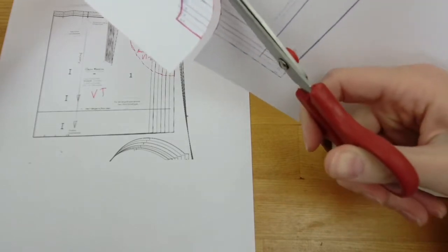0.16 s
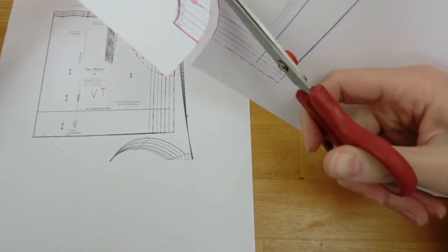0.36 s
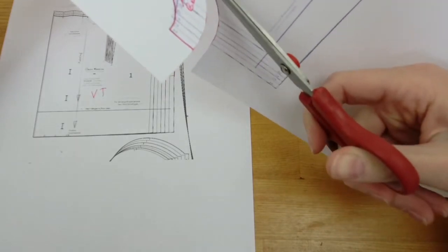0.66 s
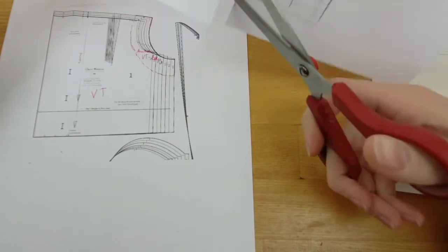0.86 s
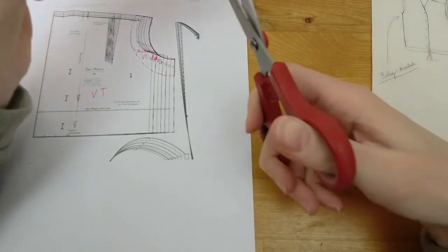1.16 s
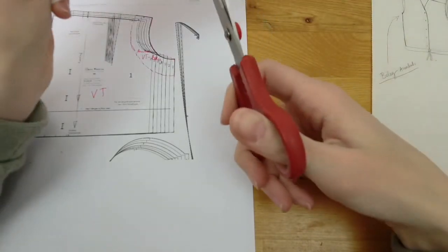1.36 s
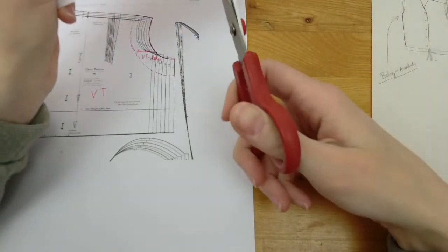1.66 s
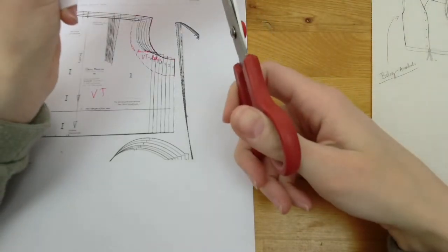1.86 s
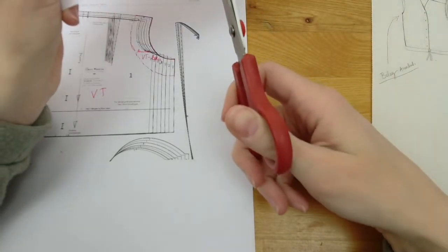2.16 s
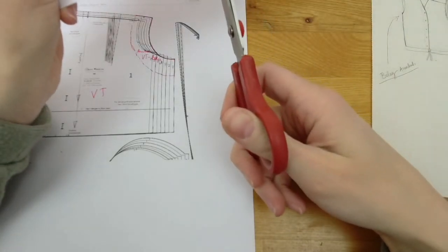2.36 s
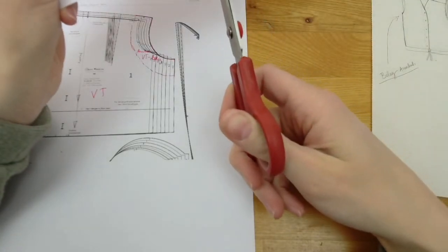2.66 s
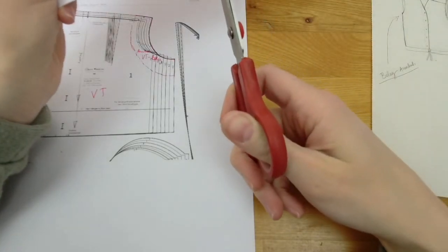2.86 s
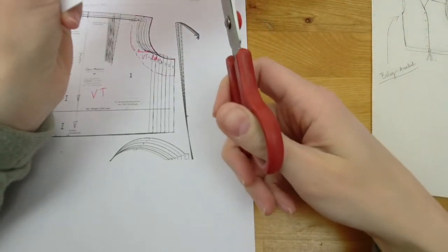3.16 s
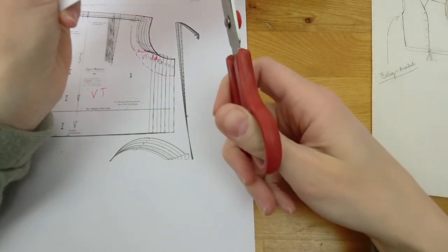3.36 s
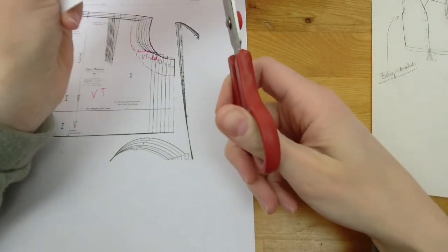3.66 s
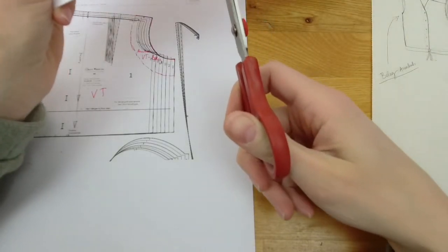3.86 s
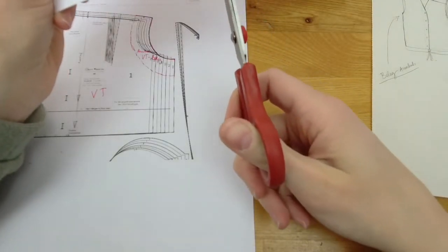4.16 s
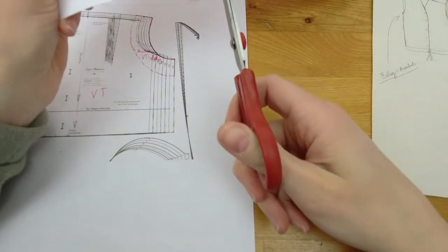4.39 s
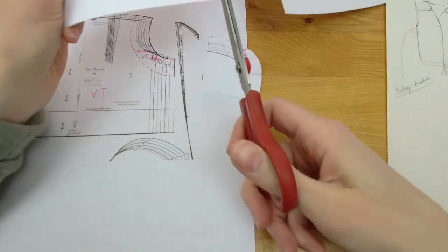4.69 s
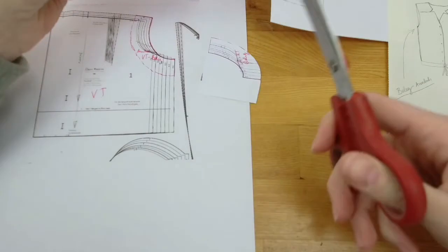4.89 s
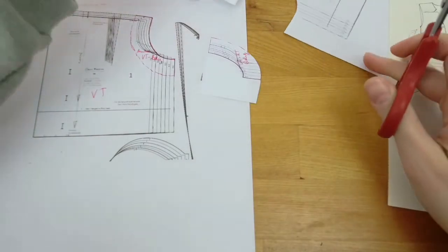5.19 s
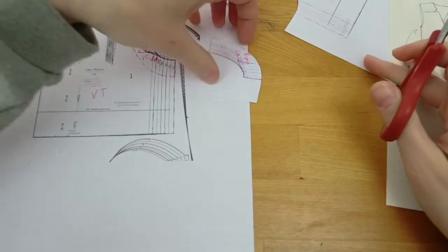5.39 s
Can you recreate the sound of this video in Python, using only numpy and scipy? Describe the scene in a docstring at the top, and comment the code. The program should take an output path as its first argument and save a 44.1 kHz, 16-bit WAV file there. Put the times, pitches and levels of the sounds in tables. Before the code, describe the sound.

Close stereo sound of paper being cut above a wooden table indoors. A few strong snips and a faint metallic blade rub open it, followed by shuffling and loose flaps of the sheet. A quiet gap leads into fine, gentle crunches with light sliding hiss, one hard final snip, paper brushing away, and low soft knocks.

```python
"""Scissors through paper

Scissors cut a pattern piece out of a sheet of paper, held just above a wooden table in a small room.
Each snip is a few bursts of breaking fibres: random grains that crack, fizz and drum through resonances.
Between snips the blades open in narrow-band friction noise, and coloured grains make the paper slide and flap.
Soft pushes boom in decaying table modes; at the end the piece comes free and a hand comes down on the table.
Noise echoes add the room, and short, wandering echo paths spread the whole mix to left and right."""
import sys
import numpy as np
from scipy import signal
from scipy.fft import rfft, irfft
from scipy.io import wavfile

SR = 44100
rng = np.random.default_rng(int(sys.argv[2]) if len(sys.argv) > 2 else 0)


def master_out(mix):
    """Clip the mix to full scale and print it as 16-bit PCM to the path in sys.argv[1]."""
    frames = np.transpose(np.atleast_2d(mix))
    ceiling = np.clip(frames, -1, 1)
    pcm = np.round(ceiling * 32767).astype(np.int16)
    wavfile.write(sys.argv[1], SR, pcm)


N = 244049
TIME = np.arange(N) / SR   # seconds

# Tone of the still room. Each row: frequency in Hz, relative level in dB.
STILL_COLOUR = [(20, -27), (60, -12.5), (97, -1.5), (140, -4), (900, -18.5), (1500, -22), (10000, -30.5)]
STILL_DB = -72

# Snips: each closing of the blades holds the sheet differently. Each row: start in seconds,
# sheet level in dB against the crack (mid-snip), fizz level in dB against the crack,
# tilt of the crack in dB per octave, pitch of the sheet as a ratio, lowest frequency it radiates in Hz,
# resonance of the cut edge in Hz, its lift in dB.
SNIPS = [(0, 0.5, -10, 0, 1.003, 303, 4130, 8), (.18, -4, -8, -0.5, 0.86, 385, 4060, 9),
         (.43, -10, -11, 0, 0.9, 397, 4240, 15.5), (.55, -14.5, -11, -4, 0.97, 326, 3830, 11.5),
         (.85, -21.5, -7, 5, 0.98, 300, 4300, 5), (.88, -6, -26.5, -6, 1.11, 260, 1450, 8),
         (2.04, -0.5, -4.5, -2, 1, 430, 2860, 8), (2.17, 6.5, -3, 0.5, 0.97, 426, 2880, 19),
         (2.29, 7.5, -4, -3, 0.98, 450, 2770, 7), (2.54, 2.5, -4, -8, 1, 529, 2780, 2),
         (3.03, -9.5, -3, -0.5, 1.06, 298, 3960, 12.5), (3.34, -5.5, -5.5, -4, 0.986, 470, 2670, 6.5),
         (3.56, -1.5, -2.5, -4.5, 0.98, 480, 2490, 10), (4.21, 1.5, -0.5, -5, 0.99, 620, 2860, 4.5),
         (4.49, 0.5, -2.5, -2, 0.98, 620, 3120, 28), (4.505, -20, -16, 6, 1.13, 290, 6100, -7),
         (4.71, -20, -10, 5.5, 0.94, 400, 5560, -8)]
DRUM_FADE_DB = 3.5   # the sheet drums less as the cut runs out towards the tips

# Bursts of parting fibres within the snips. Each row: time in seconds, volley length in seconds,
# crack level in dB (averaged over two volley lengths).
BURSTS = [(0.0106, 0.00098, -21), (0.0212, 0.00025, -24), (0.0507, 0.0016, -23.5), (0.0706, 0.00052, -36),
          (0.1951, 0.0023, -21), (0.2378, 0.00061, -21), (0.247, 0.0017, -20.5), (0.262, 0.0013, -31.5),
          (0.441, 0.0017, -20.5), (0.476, 0.00065, -23.5), (0.4823, 0.00068, -22), (0.4867, 0.00095, -17.5),
          (0.511, 0.00044, -39), (0.5646, 0.0012, -10.5), (0.58, 0.00059, -16), (.584, 0.00098, -11.5),
          (0.6007, 0.0012, -14), (0.8668, 0.0013, -12.5), (0.8857, 0.002, -20), (0.9, 0.0019, -35),
          (2.065, .0012, -37.5), (2.0755, 0.0016, -35), (2.093, 0.001, -33.5), (2.103, 0.0013, -35),
          (2.122, .0016, -36.5), (2.138, .001, -44), (2.1477, 0.0013, -34), (2.159, 0.0016, -31.5),
          (2.182, 0.00149, -31.5), (2.2118, 0.00088, -28), (2.23, 0.0012, -45), (2.3049, 0.002, -40),
          (2.334, 0.0015, -37.5), (2.3533, 0.0011, -35.5), (2.3604, 0.0012, -31.5), (2.3952, 0.0019, -31.5),
          (2.42, 0.00081, -38.5), (2.437, 0.0014, -30), (2.449, 0.00081, -33.5), (2.4739, 0.0021, -29),
          (2.554, 0.0014, -32), (2.572, 0.0018, -33), (2.5855, 0.00085, -33.5), (2.76, 0.00098, -36),
          (2.786, 0.0013, -42.5), (3.0412, 0.00101, -15.5), (3.356, 0.0019, -32), (3.3756, 0.0011, -24),
          (3.403, 0.0013, -35), (3.426, 0.0014, -32.5), (3.572, 0.00096, -31), (3.5793, 0.00073, -27),
          (3.604, 0.0012, -31.5), (3.613, 0.0014, -30), (3.622, 0.00095, -32.5), (3.823, 0.0007, -47),
          (4.188, 0.0014, -44), (4.225, 0.0023, -30.5), (4.238, 0.0013, -28), (4.274, 0.00085, -30),
          (4.289, 0.0017, -25), (4.38, 0.0011, -32.5), (4.443, 0.00089, -45), (4.4963, 0.0026, -24.5),
          (4.5098, 0.00062, -6.5), (4.7188, 0.00021, -12.5), (4.7592, 0.00066, -16)]
SECOND_AFTER, SECOND_DB = 2.183, -3.5   # second volley: gap in volley lengths, level against the first
# The snap in a volley: level against the spray, moment in volley lengths, scatter of its log.
SNAP_DB, SNAP_AT, SNAP_JITTER = -6, .8, .25
BARE_DB = -8   # bare click of the fibres against the resonances of the cut
EDGE_WIDTH_HZ, EDGE_DETUNE = 420, 0.022   # cut edge: width, scatter of its log pitch per burst

# Slow cuts that crunch all the way. Each row: start in seconds, length in seconds,
# crack level in dB of the strongest bursts.
TEARS = [(0.734, .13, -27), (2.043, .165, -41.5)]
TEAR_VOLLEY_S, TEAR_SPREAD_DB = 0.001, 12

# Resonances of the sheet as a membrane. Each row: frequency in Hz, width in Hz, relative level in dB.
SHEET_MODES = [(402, 230, -12.5), (637, 81, -7.5), (884, 150, 0.5), (1141, 230, -8)]
# Resonances of the cut at the blades. Each row: frequency in Hz, width in Hz, relative level in dB.
CRACK_MODES = [(1830, 480, 2), (3016, 380, 3), (4290, 1700, -1.5), (6400, 900, 5), (6580, 570, -6)]
# Resonances of the snapping fibres. Each row: frequency in Hz, width in Hz, relative level in dB.
FIZZ_MODES = [(8094, 1100, -2), (9700, 1800, 1), (12170, 1600, -1)]

# Scissors, hand and wrist knocking on the table. Each row: time in seconds,
# contact in seconds (four times the decay constant of the push), level in dB.
BUMPS = [(0.2, 0.001, -51.5), (0.924, .004, -49.5), (5.195, .004, -61), (5.349, 0.0026, -37.5),
         (5.368, 0.0017, -37.5), (5.387, 0.0011, -50), (5.416, 0.0015, -40.5), (5.48, 0.0015, -45)]
# Modes of the table top. Each row: frequency in Hz, level in dB, 60 dB decay in seconds.
TABLE_MODES = [(97.1, -2, 0.62), (170, 3.5, 0.15), (257, 1.5, 0.0073), (352, -8.5, 0.07), (457, -9.5, 0.21)]
KICK_DB, KICK_LIMIT_DB = -38, -20.5   # a burst kicks the table: against its crack, up to this crack level

# Blades rubbing on each other as they open. Each row: start in seconds, length in seconds, level in dB,
# main resonance in Hz, level of the upper resonances against it in dB.
OPENINGS = [(0.113, 0.031, -48, 4960, -6.5), (0.362, 0.044, -55.5, 5100, -16),
            (1.803, 0.1, -74.5, 4700, -3.5), (3.193, 0.018, -61, 4610, -1)]
# Upper resonances of the rubbing blades. Each row: frequency in Hz, width per filter pass in Hz,
# relative level in dB.
BLADE_UPPER_MODES = [(8300, 500, -1), (9800, 840, -2)]

# Jolts that leave the blades ringing faintly. Each row: time in seconds, level in dB.
JOLTS = [(.252, -41), (.604, -38.5), (1.315, -57)]
BLADE_HZ, BLADE_T60_S = 1950, 0.2

# Sheet edges dragged along or knocked, each sounding in one resonance. Each row: start in seconds,
# length in seconds, level in dB, centre of the resonance in Hz.
EDGE_TOUCHES = [(0.707, 0.023, -40, 830), (0.718, 0.093, -30.5, 2850), (1.172, 0.057, -51, 2925),
                (1.259, 0.0071, -48.5, 1423), (2.903, 0.017, -47, 940), (5.079, 0.0085, -42.5, 970),
                (5.072, 0.025, -44, 2090)]

# Strokes of paper sliding over blades and fingers. Each row: start in seconds, attack in seconds,
# length in seconds, rub level in dB at mid-stroke, growth over the stroke in dB, hiss against rub in dB.
STROKES = [(0.71, 0.015, 0.16, -38, 5, -3), (0.875, 0.016, 0.042, -42.5, -14.5, -17.5),
           (1.155, 0.024, 0.099, -49.5, -1, 5), (1.252, 0.0051, 0.04, -56, -8, -5.5),
           (1.308, 0.0052, 0.022, -55, 7, -4.5), (1.539, 0.055, 0.13, -67, -0.5, 4),
           (1.771, 0.035, 0.11, -69, -14, 2.5), (2.038, 0.015, 0.19, -50, -7.5, -8),
           (2.795, 0.019, 0.36, -63, 28, -5.5), (3.056, 0.019, 0.063, -39.5, -5.5, -4.5),
           (1.84, 0.05, 1.375, -78.5, 9.5, 4.5), (3.304, 0.077, 0.22, -63, -0.5, 1),
           (3.656, 0.032, 0.16, -62.5, -5, 3.5), (3.825, 0.046, 0.11, -55, -7, 5.5),
           (3.937, 0.017, 0.58, -66.5, 12.5, -2), (4.523, 0.0069, 0.033, -38, -5.5, -9),
           (4.563, 0.011, 0.085, -52, 16.5, 1.5), (4.643, 0.0092, 0.075, -43, -12.5, 0.5),
           (4.725, 0.011, 0.045, -31.5, -0.5, 2), (4.777, 0.0092, 0.058, -46, -8.5, 3),
           (4.861, 0.014, 0.093, -51, 24.5, 9.5), (4.957, 0.018, 0.16, -51, -2.5, 8.5),
           (5.124, 0.025, 0.11, -70, -22.5, 11.5), (5.3444, .002, 0.04, -70.5, -16, 20.5),
           (5.401, 0.035, 0.078, -75, -3, 25)]
# Sheet against rub in dB, and the dB it loses for each dB that the hiss gains.
SLIDE_DRUM_DB, LIGHT_TOUCH_SHARE = -5, 0.79
STROKE_RELEASE_S, RELEASE_SHARE = 0.0042, 0.012   # die-away time, plus a share of the stroke length
# Strokes below this level halt and crackle: swing in dB and added crackle gain at the lightest touch.
FIRM_DB, HALTING_DB, HALTING_CRACKLE = -47.5, 3, 0.27
# Tone of the sheet drumming under a stroke. Each row: frequency in Hz, relative level in dB.
SHEET_RUB_COLOUR = [(40, -41.5), (350, -13.5), (550, -18), (880, 0), (1150, -7), (1500, -12), (2500, -19)]
# Tone of the rub itself. Each row: frequency in Hz, relative level in dB.
RUB_COLOUR = [(1000, -34.5), (1700, -9.5), (2300, -11), (2900, 0.5), (3600, -2.5), (4600, 4), (6000, -1),
              (7500, -7.5)]
# Tone of the hiss of a light touch. Each row: frequency in Hz, relative level in dB.
HISS_COLOUR = [(4000, -43), (5800, -5.5), (7300, -1), (8400, 4.5), (10000, 4.5), (12000, 3), (13000, -7.5),
               (14000, -4.5), (15500, -32)]

# Loose sheet flapping, gripped anew or pressed down. Each row: start in seconds, length in seconds,
# level in dB, top of the sound in Hz.
FLAPS = [(0.885, 0.019, -35, 3000), (0.909, 0.032, -33, 2010), (1.003, 0.028, -55, 450),
         (1.06, 0.012, -48.5, 869), (1.118, 0.024, -44, 1790), (1.135, 0.089, -58.5, 445),
         (1.316, 0.0044, -38.5, 4000), (1.671, 0.011, -58, 1516), (3.036, 0.048, -47.5, 1530),
         (4.767, 0.0088, -32.5, 1930), (5.34, 0.06, -56, 700)]
# Tone of the buckling pops. Each row: frequency in Hz, relative level in dB.
FLAP_COLOUR = [(30, -25), (95, -4.5), (170, -6), (350, 6), (900, 5.5), (1400, -0.5), (2200, -17.5),
               (5000, -45)]

# Decay of the room. Each row: frequency in Hz, 60 dB decay in seconds.
ROOM_T60 = [(100, 0.5), (4000, 0.2568), (14000, 0.56)]
# Level of the room's echoes. Each row: frequency in Hz, level in dB.
ROOM_TAIL = [(100, 6.5), (900, -11.5), (2500, -10.5), (14000, -17)]
# Unlikeness of the two ears from close reflections, before a gain of 0.78.
# Each row: frequency in Hz, level in dB.
SPREAD = [(100, -28), (650, -23.5), (1300, -17), (14000, -10)]
# The treble comes from a little to the left. Each row: frequency in Hz, side against mid in dB.
LEAN = [(500, -49), (1000, -31), (14000, -22.5)]
CUTOFF_HZ = 16200


def from_db(db):
    """Turn decibels into gain."""
    return 10 ** (np.asarray(db) / 20)


def rms_one(x):
    """Level a sound to rms 1."""
    return x / np.sqrt(np.mean(x ** 2) + 1e-20)


def energy_one(x):
    """Level a short sound to total energy 1."""
    return x / np.sqrt(np.sum(x ** 2) + 1e-20)


def at_hz(points, hz):
    """Read a curve on a log-frequency axis."""
    f, value = np.transpose(points)
    return np.interp(np.log(np.maximum(hz, 1)), np.log(f), value)


def coloured(x, spectrum):
    """Give a sound a spectrum that falls away above its last point."""
    hz = np.arange(len(x) // 2 + 1) * SR / len(x)
    top_fall = np.maximum(1, hz / spectrum[-1][0]) ** 2
    return irfft(rfft(x) * from_db(at_hz(spectrum, hz)) / top_fall, len(x))


def band(x, low_hz, high_hz):
    """Keep what lies between two frequencies."""
    sos = signal.butter(2, [low_hz, min(high_hz, SR * .45)], "band", fs=SR, output="sos")
    return signal.sosfilt(sos, x)


def resonate(x, hz, width):
    """Pass a sound through one resonance with gain 1 at its peak."""
    r = np.exp(-np.pi * width / SR)
    top = np.array([1, 0, -1]) * (1 - r * r) / 2
    return signal.lfilter(top, [1, -2 * r * np.cos(2 * np.pi * hz / SR), r * r], x)


def resonate_twice(x, hz, width):
    """Two passes of the same resonance make steeper flanks."""
    return resonate(resonate(x, hz, width), hz, width)


def ring(force, hz, t60):
    """A unit click sets a sine of height 1 ringing."""
    r, w = from_db(-60 / (t60 * SR)), 2 * np.pi * hz / SR
    return signal.lfilter([0, np.sin(w)], [1, -2 * r * np.cos(w), r * r], force + 1e-18)


def add(track, s, sound):
    """Mix a sound into a track at time s."""
    i = max(0, round(s * SR))
    track[i:i + len(sound)] += sound[:max(0, N - i)]


def swell(t, length):
    """A quick rise and a slower fall, with top 1 at five sixths of the length."""
    u = np.maximum(t, 0) / length * 1.2
    return u * np.exp((1 - u * u) / 2)


def drift(per_s):
    """A random slow wander; spread 1."""
    knots = rng.standard_normal(int(N / SR * per_s) + 3)
    return rms_one(np.interp(TIME * per_s, np.arange(len(knots)), knots))


def grains(size, per_s, spread_db):
    """Tiny slips at random moments, most small and a few large; rms 1."""
    sizes_db = spread_db * np.minimum(rng.exponential(1, size), 4)
    heights = from_db(sizes_db) * rng.choice([-1, 1], size)
    return rms_one(heights * (rng.random(size) < per_s / SR))


def still_room():
    """The quiet room is steady noise, strongest in the bass."""
    return from_db(STILL_DB) * rms_one(coloured(rng.standard_normal(N), STILL_COLOUR))


def snips():
    """The bursts of one snip share its colour, and the drumming fades from the first to the last."""
    out, bursts = np.zeros(N), sorted(BURSTS + tearing())
    ends = [row[0] for row in SNIPS[1:]] + [N / SR]
    for (start, sheet_db, *hold), end in zip(SNIPS, ends):
        run = [row for row in bursts if start <= row[0] < end]
        for k, (s, length, crack_db) in enumerate(run):
            along = (k + .5) / len(run) - .5
            lead, sound = burst(length, crack_db, sheet_db - DRUM_FADE_DB * along, *hold)
            add(out, s - lead, sound)
    return out


def burst(length, crack_db, sheet_db, fizz_db, tilt_db, pitch, lowest_hz, edge_hz, edge_db,
          size=3072, crunch_db=-14):
    """Two volleys of breaking fibres ring in sheet and blades; returns the lead-in (s) and the sound."""
    t = (np.arange(size) - size // 8) / SR
    length = max(length, 1 / 4000)
    # a few fibres fail just ahead of the volleys, and stragglers follow as the cut moves on
    straggle = np.exp(-np.maximum(t / .012, -t / .0008))
    volleys = volley(t, length) + from_db(SECOND_DB) * volley(t - SECOND_AFTER * length, length)
    force = volleys + from_db(crunch_db) * grains(size, per_s=2800, spread_db=1.5) * straggle

    stretched = [(hz * pitch, width, db) for hz, width, db in SHEET_MODES]
    sheet = ring_out(force, stretched, lowest_hz, 2300, detune=0.0056, vary_db=2.5)

    middle_hz = np.median([hz for hz, width, db in CRACK_MODES])
    tilted = [(hz, width, db + tilt_db * np.log2(hz / middle_hz)) for hz, width, db in CRACK_MODES]
    crack = ring_out(force, tilted, 1200, 11000, detune=0.093, vary_db=5.0)
    bare = band(force, 1000, 9000)
    crack = crack + from_db(BARE_DB) * bare / np.linalg.norm(bare)
    edge_now_hz = edge_hz * np.exp(EDGE_DETUNE * rng.standard_normal())
    crack = crack + (from_db(edge_db) - 1) * resonate(crack, edge_now_hz, EDGE_WIDTH_HZ)
    crack = crack / np.linalg.norm(crack)

    fizz = ring_out(force, FIZZ_MODES, 5000, 13500, detune=0.057, vary_db=3.5)
    mix = from_db(sheet_db) * sheet + crack + from_db(fizz_db) * fizz
    return -t[0], from_db(crack_db) * np.sqrt(2 * length * SR) * mix


def volley(t, length):
    """One bundle of fibres snaps, amid a spray of smaller breaks."""
    snap_s = length * SNAP_AT * np.exp(SNAP_JITTER * rng.standard_normal())
    snap = np.arange(len(t)) == np.searchsorted(t, snap_s)
    spray = grains(len(t), per_s=11000, spread_db=2.5) * swell(t, length)
    return spray + from_db(SNAP_DB) * np.sqrt(length * SR) * snap


def ring_out(force, modes, low_hz, high_hz, detune, vary_db):
    """The struck modes shift a little in pitch and level with every burst; energy 1."""
    chance = rng.standard_normal((len(modes), 2))
    out = np.zeros(len(force))
    for k, ((hz, width, db), (shift, lift)) in enumerate(zip(modes, chance)):
        gain = (-1) ** k * from_db(db + vary_db * lift)   # neighbours ring in opposite polarity
        out += gain * resonate(force, hz * np.exp(detune * shift), width)
    return energy_one(band(out, low_hz, high_hz))


def tearing(count=15):
    """A slow, steady cut crunches: small bursts follow each other at uneven gaps and strengths."""
    chance = rng.random((len(TEARS), count, 2))
    rows = []
    for (start, length, db), draws in zip(TEARS, chance):
        for k, (late, weak) in enumerate(draws):
            rows.append((start + length * (k + late) / count, TEAR_VOLLEY_S, db - TEAR_SPREAD_DB * weak))
    return rows


def table():
    """Soft contacts, and the kick of each burst through the lower blade, set the table top booming."""
    force = np.zeros(N)
    kicks = [(s, length, KICK_DB + min(crack_db, KICK_LIMIT_DB)) for s, length, crack_db in BURSTS]
    for s, contact, db in BUMPS + kicks:
        push = np.exp(-np.arange(SR // 20) / (contact * SR / 4))
        add(force, s, from_db(db) * push / push.sum())
    out = sum(from_db(db) * ring(force, hz, t60) for hz, db, t60 in TABLE_MODES)
    return band(out, 65, 3000)   # the board radiates little below its first mode


def blades(width_hz=950):
    """Steel on steel whispers in a few narrow resonances, catching as it goes."""
    friction = grains(N, per_s=12000, spread_db=1.5) * from_db(5 * drift(per_s=23))
    upper = rms_one(sum(from_db(db) * resonate_twice(friction, hz, width)
                        for hz, width, db in BLADE_UPPER_MODES))
    out = np.zeros(N)
    for s, length, db, hz, upper_db in OPENINGS:
        main = rms_one(resonate_twice(friction, hz, width_hz))
        out += from_db(db) * swell(TIME - s, length) * (main + from_db(upper_db) * upper)
    return out


def blade_ring():
    """A jolt leaves the steel ringing on one thin note."""
    force = np.zeros(N)
    for s, db in JOLTS:
        add(force, s, from_db([db]))
    return ring(force, BLADE_HZ, BLADE_T60_S)


def sheet_edges(width_hz=850, wander=.055):
    """A dragged or knocked edge drives one broad resonance with stuttering grains; its pitch wanders."""
    stutter = grains(N, per_s=8400, spread_db=3.0) * from_db(2.4 * drift(per_s=260))
    # the resonance wanders as the sheet bends: running phase for a 1 Hz centre
    cycles = np.cumsum(np.exp(wander * drift(per_s=91))) / SR
    r = np.exp(-np.pi * width_hz / SR)
    out = np.zeros(N)
    for s, length, db, hz in EDGE_TOUCHES:
        span = slice(round(s * SR), round(s * SR) + SR // 2)
        turn = np.exp(2j * np.pi * hz * cycles[span])
        # shift the resonance down to 0 Hz, smooth there, and shift back up
        tone = (signal.lfilter([1], [1, -2 * r, r * r], stutter[span] / turn) * turn).real
        add(out, s, from_db(db) * swell(TIME[span] - s, length) * rms_one(tone))
    return out


def sliding(clump_db=3.0, crackle_db=-9):
    """Paper slips in clumps, with crackling creases; a light touch hisses more, drums less and halts."""
    power = np.zeros((3, N))   # sheet, rub, hiss
    for *shape, hiss_db in STROKES:
        shares = from_db([[SLIDE_DRUM_DB - LIGHT_TOUCH_SHARE * hiss_db], [0], [hiss_db]])
        power += (shares * stroke(*shape)) ** 2
    level_db = 10 * np.log10(power.sum(axis=0) + 1e-12)
    light = np.clip((FIRM_DB - level_db) / 10, 0, 1)   # 1 is the lightest touch
    swing_db = clump_db * drift(per_s=140) + HALTING_DB * light * drift(per_s=29)
    slips = grains(N, per_s=15000, spread_db=1.0) * from_db(swing_db)
    crackle = grains(N, per_s=210, spread_db=2.5)
    slips = slips + (from_db(crackle_db) + HALTING_CRACKLE * light) * crackle
    colours = (SHEET_RUB_COLOUR, RUB_COLOUR, HISS_COLOUR)
    return sum(gain * rms_one(coloured(slips, colour)) for gain, colour in zip(np.sqrt(power), colours))


def stroke(start, attack_s, length, db, growth_db):
    """A stroke sets in, grows or fades evenly in dB as it speeds up or slows down, and dies away."""
    t = TIME - start
    attack = np.sin(np.pi / 2 * np.clip(t / attack_s, 0, 1)) ** 2
    release_s = STROKE_RELEASE_S + RELEASE_SHARE * length
    release = np.exp(-np.clip((t - length) / release_s, 0, 20))
    return attack * from_db(db + growth_db * (np.clip(t / length, 0, 1) - .5)) * release


def flapping():
    """The slack sheet buckles in dull, uneven pops, each flap with its own upper limit."""
    pops = coloured(grains(N, per_s=1500, spread_db=1.0), FLAP_COLOUR)
    return sum(from_db(db) * swell(TIME - s, length) * rms_one(band(pops, 26, top_hz))
               for s, length, db, top_hz in FLAPS)


def room_tail(size=20000, early_db=6.0, early_s=0.015):
    """Dense early echoes from nearby things, then a diffuse tail with its own decay in each band."""
    t, edges = np.arange(size) / SR, np.geomspace(70, 18000, 9)
    out, early = np.zeros(size), from_db(early_db) * swell(t, early_s)
    for low, high in zip(edges, edges[1:]):
        hz = np.sqrt(low * high)
        tail = from_db(-60 * t / at_hz(ROOM_T60, hz)) * (1 - np.exp(-t / .004))
        fade = energy_one(tail + early)
        out += from_db(at_hz(ROOM_TAIL, hz)) * band(rng.standard_normal(size), low, high) * fade
    return out


def in_room(x):
    """The echoes of a sound in the room, drawn afresh at each call."""
    return signal.fftconvolve(x, room_tail())[:N]


def spread_out(x, size=512):
    """Four short echo paths with wandering shares spread the whole mix to left and right."""
    paths = rng.standard_normal((4, size)) * swell(np.arange(size) / SR, 0.0018)
    side = np.zeros(N)
    for path in paths:
        share = np.tanh(2 * drift(per_s=250))
        side += signal.fftconvolve(x, energy_one(path))[:N] * share
    return coloured(side * 0.78, SPREAD)


def scene():
    """Scissors and paper close to the microphone, with the table and the small room around them."""
    near = snips() + blades() + sheet_edges() + sliding() + flapping()
    mid = near + in_room(near) + table() + blade_ring() + still_room()
    wide_room = from_db(-6.0) * band(in_room(near), 1100, 18000)
    side = spread_out(mid) + coloured(mid, LEAN) + wide_room
    return np.array([mid + side, mid - side])   # left, right


def record(dry):
    """Peaks beyond 0.88 are clipped; then a steep filter cuts the top."""
    top_cut = signal.ellip(10, .1, 80, CUTOFF_HZ, fs=SR, output="sos")
    return signal.sosfilt(top_cut, np.clip(dry, -.88, .88))


dry = scene()
out = record(dry)
master_out(out)
```